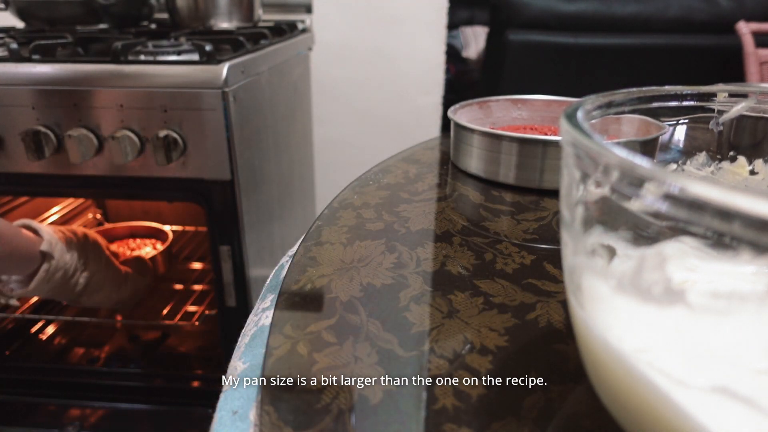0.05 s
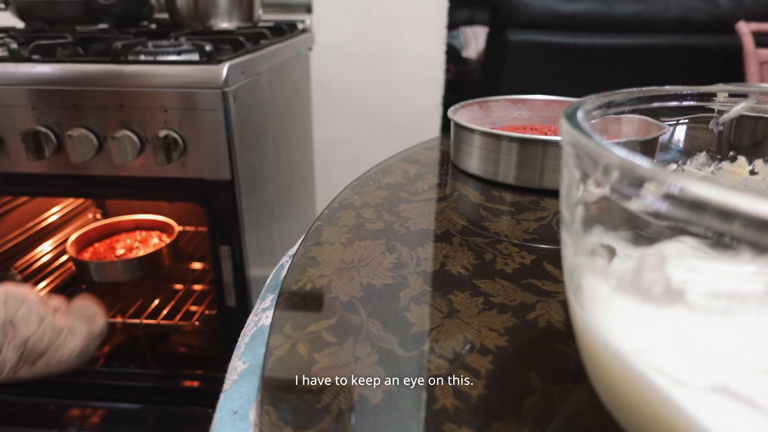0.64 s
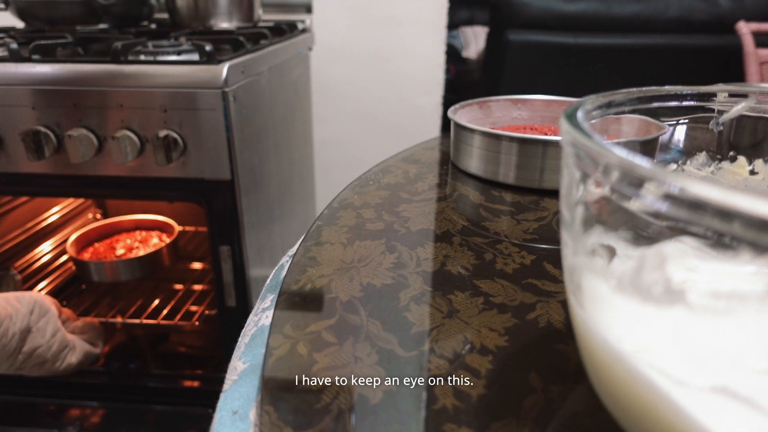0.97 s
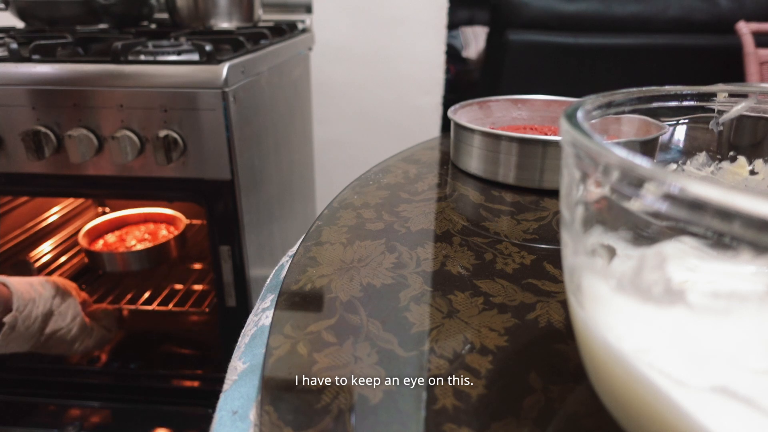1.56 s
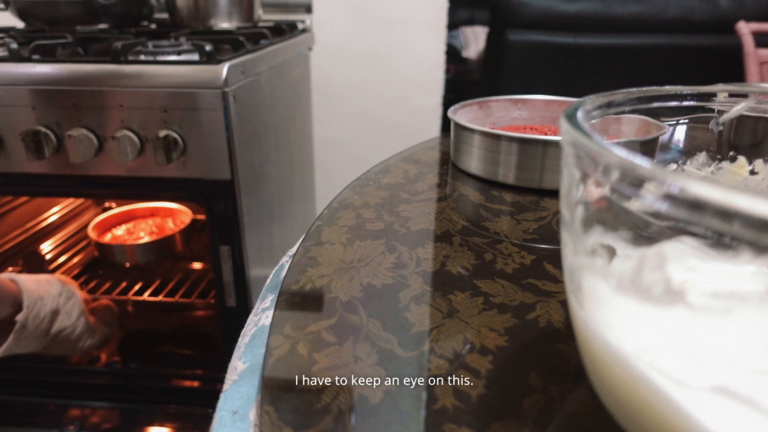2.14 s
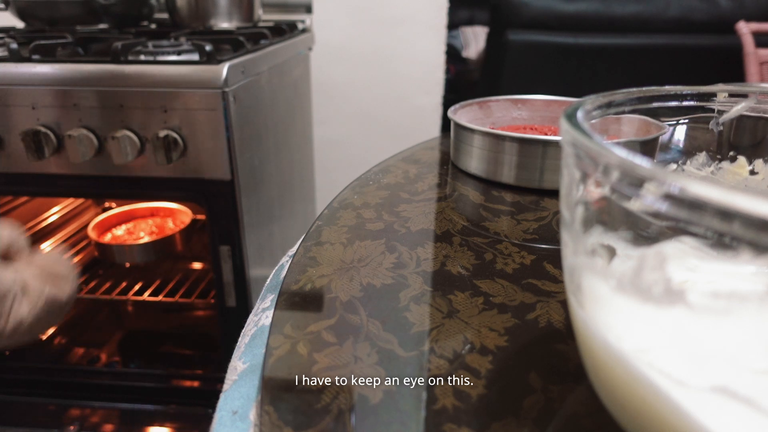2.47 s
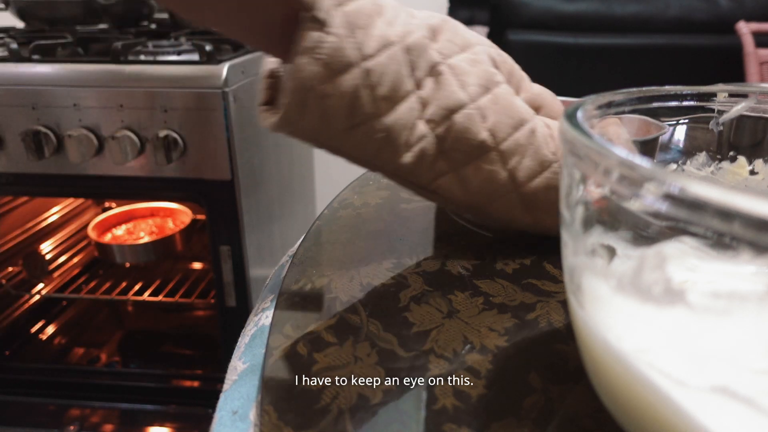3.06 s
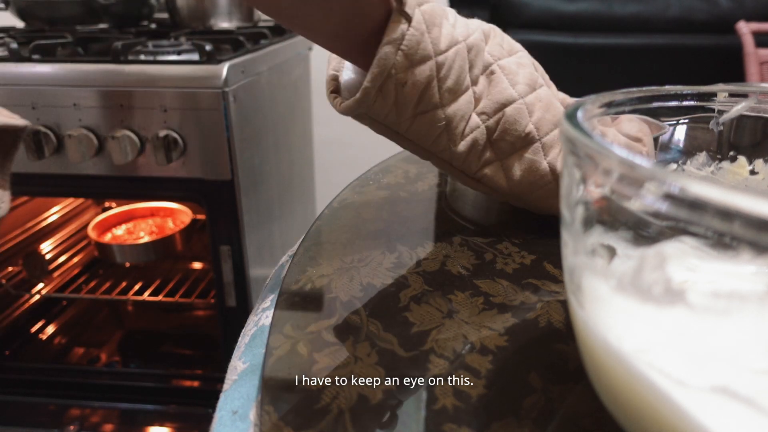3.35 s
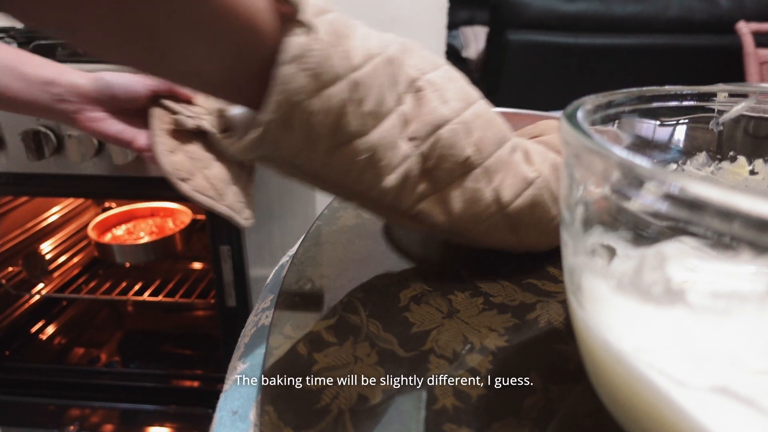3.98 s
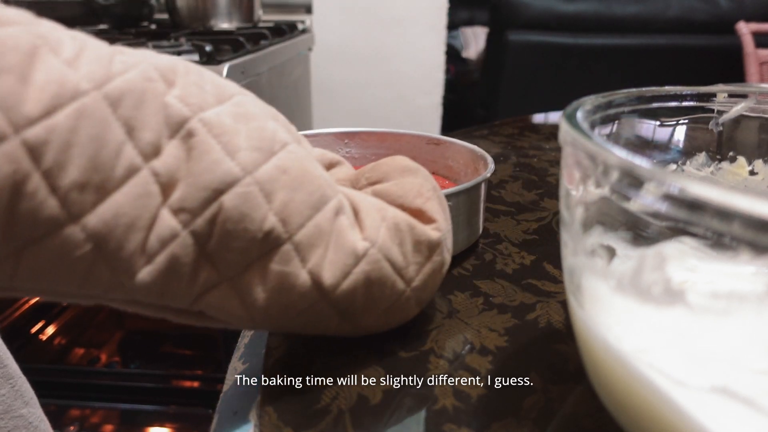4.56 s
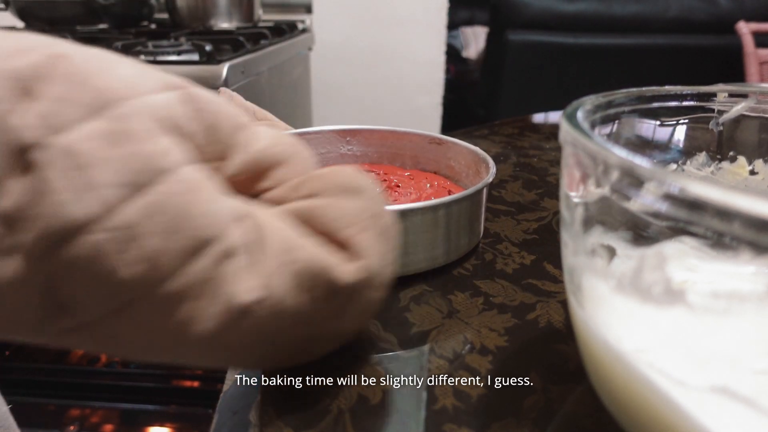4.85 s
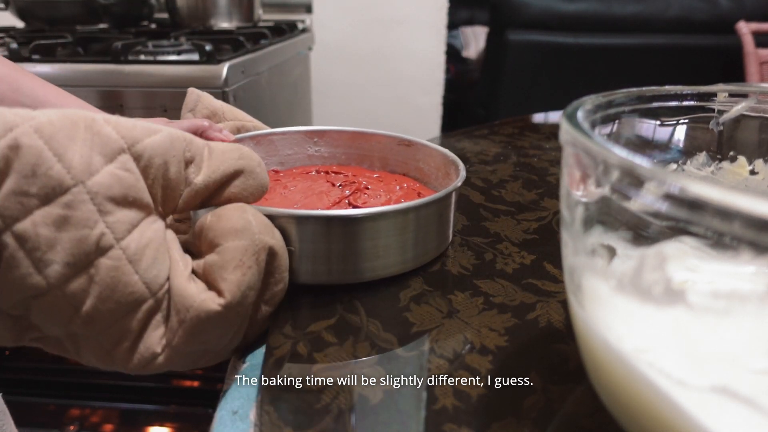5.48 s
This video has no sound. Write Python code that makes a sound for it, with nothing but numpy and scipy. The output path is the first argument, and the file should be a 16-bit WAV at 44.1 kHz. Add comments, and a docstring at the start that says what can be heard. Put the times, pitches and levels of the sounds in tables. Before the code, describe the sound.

In a small, hard-walled kitchen, a metal cake pan scrapes loudly onto a wire oven rack and rocks to rest with faint ticks. The rack slides in, rasping and groaning, and hits its stop with a ringing clunk. Then, close to the microphones, quilted oven mitts softly knock, tap and rub on a second pan. The oven is slightly left, over a low rumble and steady hiss.

```python
"""A small, hard-walled kitchen, heard from two close microphones at a glass table, the oven to the left. A
metal cake pan scrapes onto the wire oven rack and rocks to rest. The rack slides in, rasping and groaning on
its runners, and clunks against its stop, which sets the oven's sheet-metal box ringing. Close ahead, quilted
oven mitts then knock, tap and brush a second pan, whose base slides on the glass as they take it from the
table. The walls answer every sound, over a low rumble, a steady hiss and a thin high whine."""
import sys
import numpy as np
from scipy import signal
from scipy.fft import rfft, irfft, next_fast_len
from scipy.io import wavfile

SR = 44100
rng = np.random.default_rng(int(sys.argv[2]) if len(sys.argv) > 2 else 0)


def to_wav(s):
    """Save 16-bit WAV."""
    ch = np.atleast_2d(s).T  # columns
    pcm = np.round(np.clip(ch, -1, 1) * 32767)  # PCM
    wavfile.write(sys.argv[1], SR, pcm.astype(np.int16))


N = 247838

# the kitchen's reverberation: (frequency [Hz], t60 [s])
KITCHEN_DECAY = [(120, 1), (250, 0.68), (500, 0.71), (1000, 0.51), (2000, 0.53), (5000, 0.37),
                 (12000, 0.28)]
# stereo width of sound from all round, the oven and the table: (frequency [Hz], side to mid [dB])
ROOM_WIDTH = [(50, -22), (180, -6), (500, -1), (1100, 0), (2500, 0), (10000, -2.5)]
OVEN_WIDTH = [(30, -13), (150, -24), (300, -21), (550, -15), (1200, -12), (2500, -9), (8000, -8)]
TABLE_WIDTH = [(100, -14), (500, -3.5), (1100, -6.5), (2500, -4.5), (7000, -5)]
# the oven favours the left microphone: (frequency [Hz], left over right [dB])
OVEN_BALANCE = [(150, -0.5), (300, 1.1), (550, 2.5), (2000, 2.5), (8000, 3.5), (13000, 2)]
# colours of the room tone: (frequency [Hz], gain [dB])
RUMBLE_COLOUR = [(25, -14), (50, -13), (80, -6), (120, 0.5), (270, 0), (400, -6), (700, -7), (2000, -29.5)]
HISS_COLOUR = [(150, -34), (300, -7), (700, -8), (1000, -7.5), (1900, -10), (3500, -15.5), (7250, -21),
               (15000, -31)]
# the oven's box booms on after the scrape and the clunk: (time [s], level [dB])
BOOMS = [(.3, -50.5), (2, -49)]
# soft low bumps while the pan is carried: (time [s], level [dB], half length [s])
BUMPS = [(5.04, -62, 0.074), (5.5, -64.5, .09)]

# hollow rings as the hands move: (start [s], length [s], level [dB], pitch [Hz], glide [Hz/s])
HOLLOW_RINGS = [(2.47, 0.077, -62.5, 568, 20), (2.922, 0.091, -60.5, 624, 60), (3.187, 0.2, -66, 623, 102),
                (3.8, 0.063, -61, 846, 30), (4.352, 0.19, -60, 660, -480)]
# strokes of the mitts and of the second pan's base sliding on the glass: (start [s], length [s], relative level
# [dB], firmness [0-1])
MITT_STROKES = [(2.33, 0.23, -64.5, 0.09), (2.567, .44, -65, 0.3), (3.388, .24, -62, 0),
                (3.69, .12, -62.5, 0), (3.796, .15, -53.5, 0), (3.925, 0.23, -47.5, 0.13),
                (4.15, 0.12, -52, 0.4), (4.275, .2, -50.5, 0.9), (4.997, .07, -62.5, 0.5),
                (5.054, 0.046, -58.5, 0.6)]
# the cloth snags and lets go: (time [s], level [dB])
SNAGS = [(2.627, -56.5), (3.417, -68), (3.833, -57), (3.959, -50), (4.561, -58.5), (4.701, -60)]
# swishes of a mitt along the rim: (time [s], level [dB], half length [s])
SWISHES = [(3.3, -69, 0.019), (4.775, -58, 0.027), (5.38, -61.5, 0.048)]
# colours of the cloth: (frequency [Hz], gain [dB])
BRUSH_COLOUR = [(300, -31), (900, -6), (1200, -11), (1800, -1.5), (3500, -5.5), (5000, 1), (8500, 2.5),
                (10500, -2), (13000, -4), (15500, -13.5)]
RUB_COLOUR = [(300, -22), (800, 2), (1100, -6), (1600, 5), (2100, -4.5), (3000, 1.5), (4600, 1), (5900, 2),
              (7000, 0), (8400, -2.5), (10000, -9.5), (15000, -21)]
SWISH_COLOUR = [(1000, -12.5), (4000, -12), (5000, 1), (5900, 7.5), (6900, -3.5), (8100, 2.5),
                (10000, -10.5), (15000, -26.5)]
# resonances of the second pan under the mitt: (frequency [Hz], width [Hz], rise [dB])
SECOND_PAN_PEAKS = [(1600, 98, 2.5), (1835, 83, 6), (2290, 65, 1.5), (2850, 320, 3.5), (3440, 54, -5),
                    (4150, 190, 2.5), (4860, 220, 3)]
# dull knocks at the table and light taps on the second pan: (time [s], level [dB])
KNOCKS = [(2.732, -47), (2.8368, -37.5)]
TAPS = [(3.4514, -40), (3.4585, -41), (3.4925, -47)]
# their colours: (frequency [Hz], gain [dB])
KNOCK_COLOUR = [(60, -29), (150, -13), (230, 5.5), (450, 1), (1000, -3), (1400, 3.5), (2000, -3),
                (3000, -3.5), (4000, -11), (5500, -24), (8500, -22), (15000, -40)]
TAP_COLOUR = [(100, -29.5), (550, -5), (900, 9), (1250, -7.5), (1650, 8.5), (2200, -4), (3800, -8),
              (5200, 0), (7600, -3.5), (8500, -2), (10000, -7), (15500, -10)]

# the first pan drags over the wires, catches its rim, drops into place: (time [s], level [dB])
DRAG_LEVEL = [(0, -18.5), (.05, -28.5), (.15, -33), (.2, -41), (.32, -81)]
RIM_CATCHES = [(.003, -13.5), (0.027, -20.5), (0.059, -16), (.096, -17), (.141, -21), (0.214, -30)]
SETTLES = [(.426, -53.5), (.484, -48.5)]
# colours of its scrape and of its ticks on the wires: (frequency [Hz], gain [dB])
SCRAPE_COLOUR = [(40, -25), (90, -9), (170, -5.5), (400, -3), (700, 1), (1300, 2), (2500, -1.5), (4500, -2),
                 (6500, -0.5), (8800, -1), (10500, -8.5), (13000, -11.5), (15500, -21.5)]
TICK_COLOUR = [(100, -9), (1800, -5), (2600, -9.5), (3300, 2), (4300, -4.5), (5200, -0.5), (6000, -0.5),
               (9000, -5), (11000, -16.5), (15500, -26)]
# resonances of the pan on the wires: (frequency [Hz], width [Hz], rise [dB])
PAN_PEAKS = [(1930, 44, 3), (2670, 50, 8), (3170, 150, 4), (4360, 48, 1), (5165, 200, 7), (6070, 99, 3.5),
             (6850, 120, 1.5), (6460, 160, 4), (7200, 180, 3), (8130, 110, 2), (8250, 60, 6),
             (8700, 120, 2.5)]
# long-lived modes of pan and rack: (frequency [Hz], relative level [dB], t60 [s])
LINGERING_MODES = [(471, -3, 0.7), (632, -3, 0.67), (1182, -5.5, 0.99), (1490, -8, 0.72), (1780, -12.5, 1),
                   (2175, -11, 0.78), (2320, -5.5, 0.74), (4000, -11, 1), (4260, -15, 0.6)]

# colours of the rack's slide and of its blows on the stop: (frequency [Hz], gain [dB])
RASP_COLOUR = [(300, -33), (1500, -9.5), (2500, -1.5), (4500, -1.5), (5800, 0), (6900, 4), (7800, -3.5),
               (10000, -5.5), (13000, -12.5), (15500, -20)]
GROAN_COLOUR = [(40, -28), (110, -11.5), (200, 2), (400, -1), (560, -3.5), (780, 3.5), (1000, -3),
                (1300, 0), (1800, -6.5), (3000, -11.5), (6000, -33)]
CLUNK_COLOUR = [(30, -40), (55, -28), (80, -15.5), (120, -12), (180, 3), (400, 1.5), (560, -4.5), (950, 2),
                (1150, -2), (1900, -5), (3200, -14), (6000, -16.5), (8500, -23.5), (12000, -24),
                (15500, -32)]
# resonances of the sliding rack: (frequency [Hz], width [Hz], rise [dB])
RACK_PEAKS = [(354.6, 22, 16.5), (377, 29, -2), (679, 15, 11.5), (1228, 68, 9), (1560, 31, 0),
              (1700, 104, 6.5), (1820, 30, 8), (2440, 140, 3.5), (3640, 55, 4.5), (3850, 98, 4),
              (7300, 50, 4), (7700, 40, -0.5)]
# the rack hits its stop and rattles: (time [s], relative level [dB])
STOP_BLOWS = [(1.8285, -11), (1.8305, -4.5), (1.836, -10), (1.842, -7), (1.851, -9), (1.862, -13)]
# modes of the oven's sheet-metal box: (frequency [Hz], relative level [dB], t60 [s])
OVEN_MODES = [(167, -12, 0.49), (188.7, -2, 0.37), (259, 7, 0.26), (327, -8, 0.23), (341, 1.5, 0.38),
              (387.4, 1, 0.3), (415.4, 2.5, 0.24), (460, 9.5, 0.13), (518, -4.5, 0.22), (679, 8, 0.21),
              (810, -8, 0.14), (922, 6, 0.23), (1010, 0, 0.2), (1299, -1, 0.25), (1700, -7, 0.32),
              (1830, -12, 0.28), (2566, -5.5, 0.25), (2940, -9, 0.33), (4060, -19, .25), (5200, -28.5, .18)]


def amp(db):
    """Decibels to gain."""
    return 10 ** (np.asarray(db) / 20)


def unit(x):
    """Scale to rms 1."""
    return x / np.sqrt(np.mean(x ** 2) + 1e-20)


def clock():
    """The time of every sample, in seconds."""
    return np.arange(N) / SR


def along(points, hz):
    """Read (frequency [Hz], value) points on a log frequency axis."""
    frequencies, values = np.transpose(points)
    return np.interp(np.log(hz + 1), np.log(frequencies), values)


def bell(time, half_length):
    """A bell-shaped surge of height 1."""
    return np.exp(-((clock() - time) / half_length) ** 2)


def swells(rows):
    """Power of bell-shaped surges: (time [s], level [dB], half length [s])."""
    return sum(amp(db) ** 2 * bell(time, half_length) for time, db, half_length in rows)


def stroke(start, length, attack, release):
    """An envelope that swells smoothly, holds until its length is up, then loses 20 dB per release."""
    t = clock() - start
    rise = np.sin(np.pi / 2 * np.clip(t / attack, 0, 1)) ** 2
    return rise * amp(-20 * np.maximum(t - length, 0) / release)


def filtered(x, response):
    """Filter x by a gain given as a function of frequency."""
    size = 2 * next_fast_len(N // 2 + SR // 2)
    hz = np.fft.rfftfreq(size, 1 / SR)
    return irfft(rfft(x, size) * response(hz), size)[..., :N]


def body(x, colour, peaks=()):
    """A causal filter of unit power: a broad colour with ringing peaks on it."""
    def response(hz):
        peaks_db = sum(rise / (1 + (2 * (hz - centre) / width) ** 2) for centre, width, rise in peaks)
        gain = unit(amp(along(colour, hz) + peaks_db))
        cepstrum = irfft(np.log(gain))
        cepstrum[1:len(hz) - 1] *= 2  # minimum phase: the ringing follows the blow
        cepstrum[len(hz):] = 0
        return np.exp(rfft(cepstrum))
    return filtered(x, response)


def grit(slips_per_s, spread_db):
    """Friction: tiny slips at random moments, their sizes scattered by spread_db; rms 1."""
    slips = rng.random(N) < slips_per_s / SR
    signs = rng.choice([-1, 1], N)
    sizes = amp(spread_db * np.clip(rng.standard_normal(N), -2, 2))
    return unit(slips * signs * sizes)


def contacts(rows, t60, snap):
    """Each contact is a sharp push (snap) plus a dying buzz, with the energy of 10 ms at its level."""
    track = np.zeros(N + SR)
    t = np.arange(SR // 4) / SR
    for time, db in rows:
        blow = rng.standard_normal(len(t)) * amp(-60 * t / t60)
        blow /= np.linalg.norm(blow)
        blow[0] += snap
        blow *= np.sqrt(SR / 100) / np.linalg.norm(blow)
        track[round(time * SR):][:len(t)] += amp(db) * blow
    return track[:N]


def fuzzy_tone(hz, width_hz):
    """Narrow noise of rms 1 around a pitch, like a resonance kept going by friction."""
    flutter = filtered(rng.standard_normal((2, N)), lambda f: 1 / (1 + (f / width_hz) ** 2))
    phase = 2 * np.pi * np.cumsum(hz * np.ones(N)) / SR
    return unit(flutter[0] * np.cos(phase) + flutter[1] * np.sin(phase))


def ringing(modes, start, attack):
    """Modes that swell from a given moment and die away, each at its own speed."""
    t = np.maximum(clock() - start, 0)
    ring = np.zeros(N)
    for hz, db, t60 in modes:
        ring += amp(db - 60 * t / t60) * np.sin(2 * np.pi * (hz * t + rng.random()))
    return ring * (1 - np.exp(-t / attack))


def microphone_pair(mid, side, width):
    """Two close microphones: alike in the bass, less so higher up."""
    side = filtered(side, lambda hz: amp(along(width, hz)))
    return np.array([mid + side, mid - side])


def kitchen(x, wet_db, width=OVEN_WIDTH):
    """Direct sound at the microphones plus a tail off the hard walls; the bass lasts longest."""
    hz, t, noise = signal.stft(rng.standard_normal((2, SR)), SR, nperseg=256)
    t60 = along(KITCHEN_DECAY, hz)[:, None]
    tail = signal.istft(noise * amp(-60 * t / t60) / np.sqrt(t60), SR, nperseg=256)[1]
    tail *= 1 - np.exp(-np.arange(tail.shape[1]) / SR / 0.002)  # the first walls answer in milliseconds
    tail /= np.linalg.norm(tail[0])
    mid, side = amp(wet_db) * signal.fftconvolve(x[None], tail, axes=1)[:, :N]
    return microphone_pair(x + mid, side, width) / np.sqrt(1 + amp(2 * wet_db))


def room_tone(rumble_db=-65, boom_fade_db_per_s=29.5):
    """All round: a low rumble, lifted by the booming oven and soft bumps, with hiss and a thin whine."""
    release = 20 / boom_fade_db_per_s
    boom_power = sum((amp(db) * stroke(time, 0, attack=0.039, release=release)) ** 2 for time, db in BOOMS)
    rumble_gain = np.sqrt(amp(rumble_db) ** 2 + boom_power + swells(BUMPS))
    rumble = rumble_gain * body(rng.standard_normal((2, N)), RUMBLE_COLOUR)
    hiss = amp(-63.5) * body(rng.standard_normal((2, N)), HISS_COLOUR)
    whine = amp(-78.5) * fuzzy_tone(hz=15730, width_hz=15)
    mid, side = rumble + hiss
    return microphone_pair(mid, side, ROOM_WIDTH) + whine


def hollow_ring():
    """At the table: a narrow, fuzzy resonance comes and glides as the hands move about the pan."""
    ring = np.zeros(N)
    for start, length, db, hz, glide in HOLLOW_RINGS:
        pitch = hz + glide * np.clip(clock() - start, 0, length)
        envelope = amp(db) * stroke(start, length, attack=0.026, release=0.12)
        ring += envelope * fuzzy_tone(pitch, width_hz=56)
    return kitchen(ring, wet_db=-1.5, width=TABLE_WIDTH)


def mitts(attack_s=0.049, release_s=0.097):
    """Close up: cloth fibres catch and slip in clumps and brush brightly, while the second pan's base slides
    firmly on the glass, fuller in tone."""
    rustle = amp(-72) * stroke(3.45, 2.1, attack_s, release_s)  # faint, as long as the arms move
    brush_power, rub_power = rustle ** 2, np.zeros(N)
    for start, length, db, firmness in MITT_STROKES:
        power = (amp(db) * stroke(start, length, attack_s, release_s)) ** 2
        brush_power += (1 - firmness) * power
        rub_power += firmness * power
    clumps_db = 2.0 * fuzzy_tone(hz=20, width_hz=22)
    light_slips = np.sqrt(brush_power) * amp(clumps_db - 1.5) * grit(slips_per_s=2500, spread_db=1.5)
    snags = contacts(SNAGS, t60=0.021, snap=0.32)
    firm_slips = np.sqrt(rub_power) * amp(clumps_db + 0.96) * grit(slips_per_s=3000, spread_db=4.5)
    rim_slips = np.sqrt(swells(SWISHES)) * grit(slips_per_s=4900, spread_db=-1.5)
    brush = body(light_slips + snags, BRUSH_COLOUR, SECOND_PAN_PEAKS)
    rub = body(firm_slips, RUB_COLOUR, SECOND_PAN_PEAKS)
    swish = body(rim_slips, SWISH_COLOUR)
    return kitchen(brush + rub + swish, wet_db=-3.0, width=TABLE_WIDTH)


def knocks_and_taps():
    """Close to the microphones: dull knocks of a hand at the table, brighter taps on the second pan."""
    knocks = body(contacts(KNOCKS, t60=0.035, snap=0.74), KNOCK_COLOUR)
    taps = body(contacts(TAPS, t60=0.017, snap=0.93), TAP_COLOUR)
    slightly_left = amp([[1], [-1]])
    return (slightly_left * kitchen(knocks, wet_db=0.5, width=TABLE_WIDTH)
            + kitchen(taps, wet_db=-1.5, width=TABLE_WIDTH))


def pan_rocking(start_s=0.6195, period_s=0.0698, count=7, peak_s=0.81, fade_s=0.2):
    """In the oven: let go, the pan settles and ticks evenly from wire to wire, building and dying away."""
    times = start_s + period_s * np.arange(count)
    levels_db = -51.5 - 10 * ((times - peak_s) / fade_s) ** 2
    ticks = contacts([*SETTLES, *zip(times, levels_db)], t60=0.031, snap=0.4)
    return kitchen(body(ticks, TICK_COLOUR, PAN_PEAKS), wet_db=-0.5)


def rack_slide(start_s=1.2036, stop_s=1.825, tight_spot_s=1.587, groan_lag_s=0.032):
    """Wire rasps on the runners and the oven walls groan, more as the push grows and at a tight spot."""
    length = stop_s - start_s
    moving = stroke(start_s, length, attack=0.082, release=0.03)
    elapsed = np.clip(clock() - start_s, 0, length)
    rasp_db = -50.5 + 10.5 * elapsed + 5.5 * bell(tight_spot_s, half_length=0.06)
    groan_db = -50 + 24 * elapsed + 6.5 * bell(tight_spot_s + groan_lag_s, half_length=0.06)
    rasp = body(moving * amp(rasp_db) * grit(slips_per_s=3900, spread_db=4.5), RASP_COLOUR, RACK_PEAKS)
    groan = body(moving * amp(groan_db) * grit(slips_per_s=1500, spread_db=2.5), GROAN_COLOUR, RACK_PEAKS)
    # the rack's lowest mode sings from the first movement and grows only slowly with effort
    sing = np.sqrt(moving) * amp(-26 + 0.5 * rasp_db) * fuzzy_tone(hz=369, width_hz=11)
    return kitchen(rasp + groan, wet_db=0.0) + kitchen(sing, wet_db=-9.5)


def pan_scrape(catch_s=0.0031):
    """The pan grinds over the wires, in surges where its rim catches, and rings on afterwards."""
    drag_db = np.interp(clock(), *np.transpose(DRAG_LEVEL))
    catch_power = swells([(time, db, catch_s) for time, db in RIM_CATCHES])
    force = np.sqrt(amp(drag_db) ** 2 + catch_power)
    grind = body(force * grit(slips_per_s=8300, spread_db=0.0), SCRAPE_COLOUR, PAN_PEAKS)
    ring = amp(-37) * ringing(LINGERING_MODES, start=0.138, attack=0.025)
    ring *= fuzzy_tone(hz=10.0, width_hz=53)  # loose contact with the wires roughens the ring
    return kitchen(grind, wet_db=1.0) + kitchen(ring, wet_db=5)


def rack_clunk():
    """The rack rattles against its stop, and the hardest blow sets the oven's box ringing."""
    blows = amp(-11.5) * body(contacts(STOP_BLOWS, t60=0.063, snap=0.29), CLUNK_COLOUR)
    hardest_s, _ = max(STOP_BLOWS, key=lambda row: row[1])
    ring = amp(-26.0) * ringing(OVEN_MODES, start=hardest_s, attack=0.0014)
    pan_jump = contacts([(hardest_s, -23)], t60=0.026, snap=0.16)
    clink = body(pan_jump, TICK_COLOUR)
    return kitchen(blows, wet_db=-2.0) + kitchen(ring, wet_db=-23.0) + kitchen(clink, wet_db=5.0)


def scene():
    """From the microphones, the oven stands to the left and the table straight ahead."""
    oven = pan_scrape() + pan_rocking() + rack_slide() + rack_clunk()
    oven = filtered(oven, lambda hz: amp(np.outer([0.5, -0.5], along(OVEN_BALANCE, hz))))
    table = knocks_and_taps() + mitts() + hollow_ring()
    return oven + table + room_tone()


def record(dry, corner_hz=70, top_hz=15900):
    """The microphones roll off the deep bass; the recorder keeps nothing above its band limit."""
    bass_cut = signal.butter(2, corner_hz, "highpass", fs=SR, output="sos")
    return filtered(signal.sosfilt(bass_cut, dry), lambda hz: hz < top_hz)


dry = scene()
out = record(dry)
to_wav(out)
```